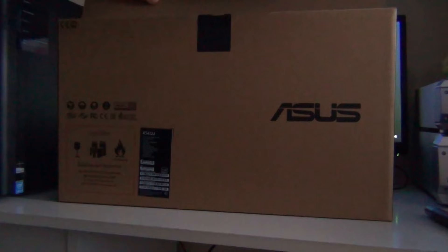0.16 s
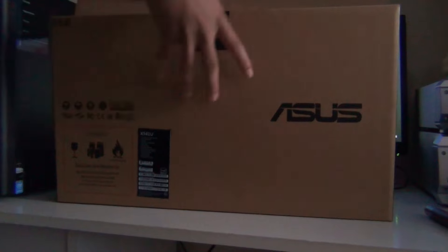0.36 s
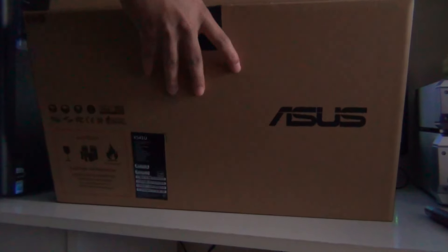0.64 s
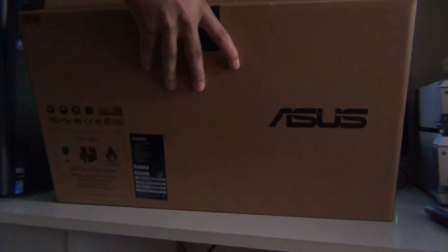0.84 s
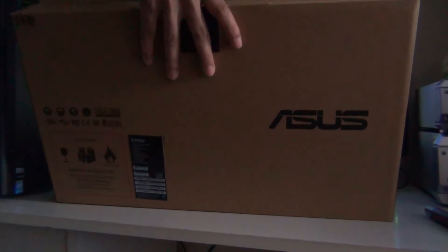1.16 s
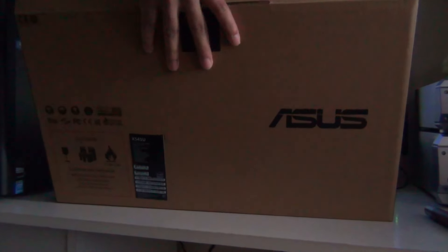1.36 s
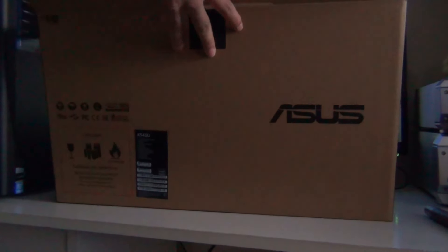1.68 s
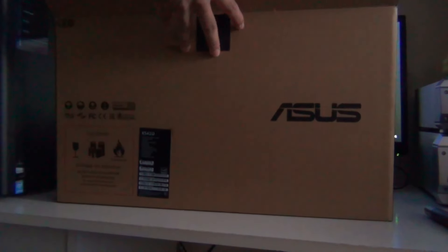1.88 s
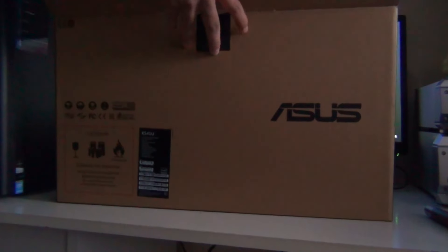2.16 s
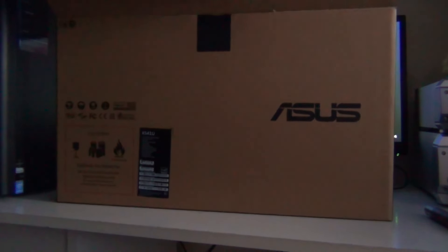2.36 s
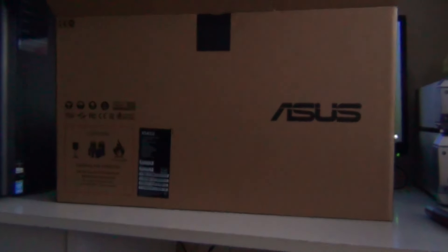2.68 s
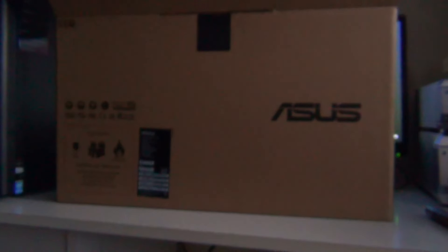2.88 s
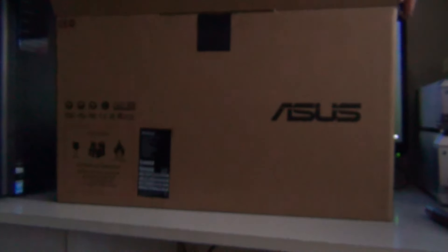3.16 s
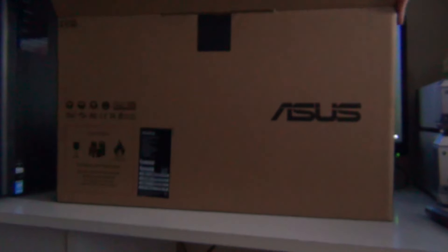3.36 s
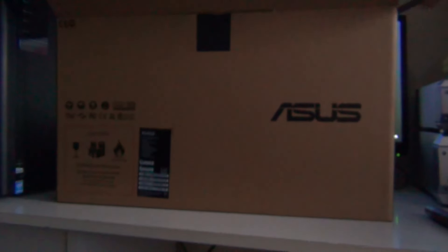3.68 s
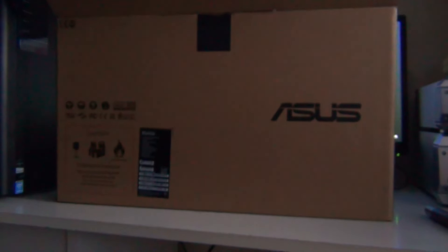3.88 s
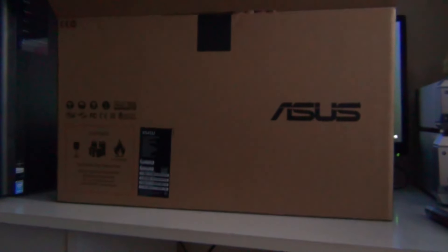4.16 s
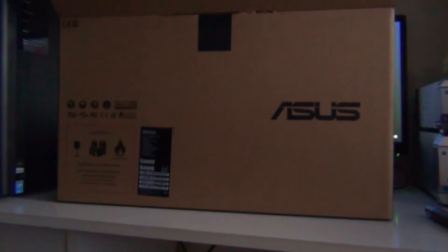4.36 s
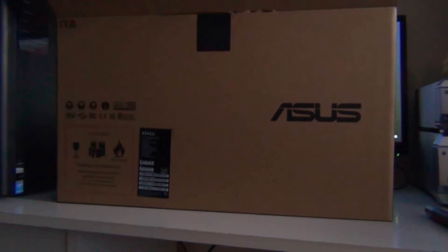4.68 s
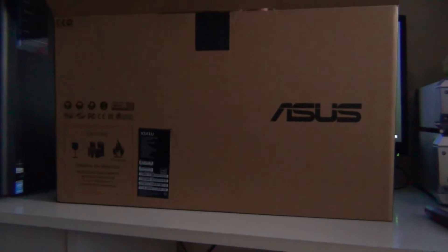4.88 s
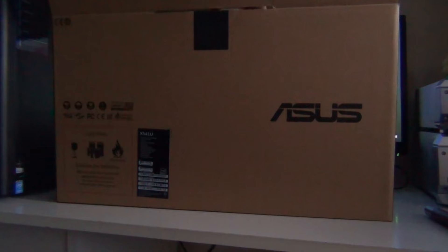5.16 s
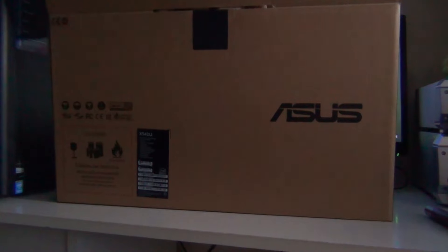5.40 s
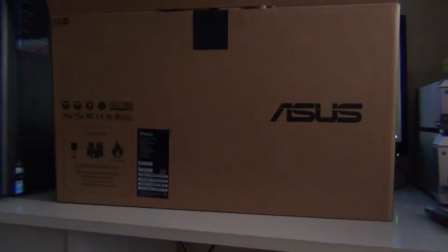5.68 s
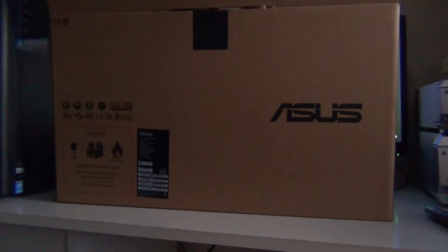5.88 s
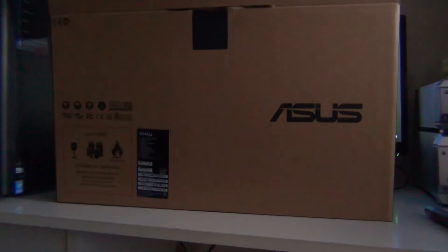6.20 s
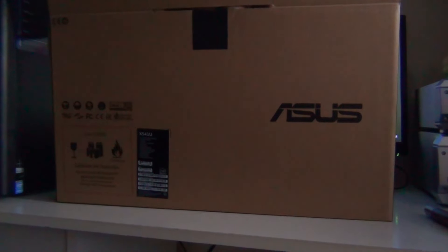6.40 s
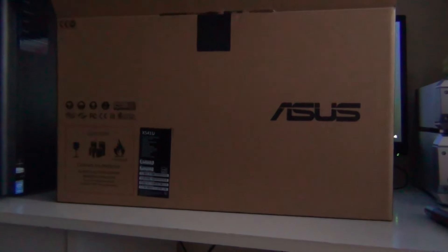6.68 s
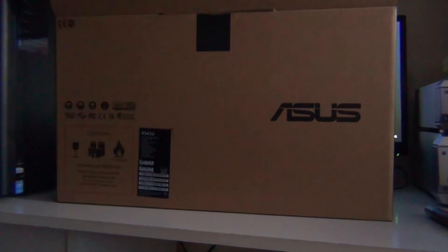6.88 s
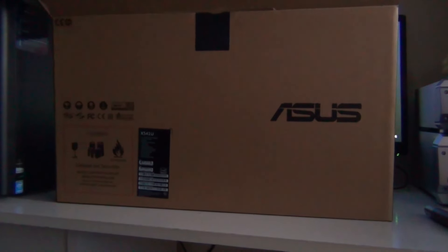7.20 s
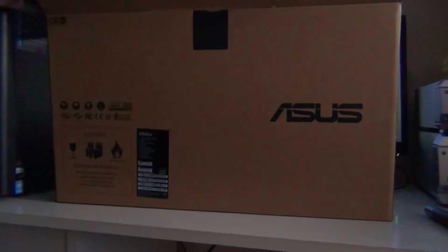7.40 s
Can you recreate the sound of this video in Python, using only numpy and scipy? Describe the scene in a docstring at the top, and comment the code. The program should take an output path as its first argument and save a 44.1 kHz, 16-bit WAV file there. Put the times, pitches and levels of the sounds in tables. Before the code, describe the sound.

Close stereo microphones in a small quiet room catch a large cardboard box being opened. Soft skin rubs and light taps come first, then a cluster of crackling pops as a stiff tab pulls free with a bright snap. Flaps scrape, creak and knock hollowly, with one strong thump past the middle, then more rubbing and a last flurry of dull knocks. Faint room noise stays beneath.

```python
"""Cardboard box opened by hand

A box stands on a shelf in a small quiet room; a pair of close microphone ports hears it over faint room noise.
Flaps knock, pop and snap: short contact bursts drive the ringing modes of the hollow box, walls and board.
Board and skin slide over board: random catches give a grainy hiss and creaking walls, and unsteady sine tones
give a few brief chirps of a ringing board patch and a few short squeaks. A very faint, high steady tone lies
behind it all."""
import sys
import numpy as np
from scipy import signal
from scipy.io import wavfile

SR = 44100
rng = np.random.default_rng(int(sys.argv[2]) if len(sys.argv) > 2 else 0)


def transcribe(u):
    """Save the signal u as a 16-bit wav file named by the first command-line argument.

    u: samples, shape (n,) or (channels, n), limited to [-1, 1]; the rate is SR.
    q: integer samples, one column per channel.
    """
    v = np.clip(np.atleast_2d(u).T, -1, 1)
    q = np.round(v * 32767).astype(np.int16)
    wavfile.write(sys.argv[1], SR, q)


N = 332514


def from_db(db):
    """Decibels to gain."""
    return 10 ** (np.asarray(db) / 20)


def rms_one(x):
    """Scaled to rms 1."""
    return x / np.sqrt(np.mean(x ** 2) + 1e-20)


def at_hz(points, hz):
    """A spectrum table read on a log-frequency axis."""
    table_hz, values = np.transpose(points)
    return np.interp(np.log(hz), np.log(table_hz), values)


def band(x, low_hz, high_hz):
    """Butterworth band-pass."""
    sos = signal.butter(2, [low_hz, min(high_hz, 0.45 * SR)], "band", fs=SR, output="sos")
    return signal.sosfilt(sos, x)


def drift(rate_hz):
    """Slow random wander of spread 1: noise smoothed by two equal poles, on a grid of 40 samples."""
    step = 40
    pole = np.exp(-2 * np.pi * rate_hz * step / SR)
    noise = rng.standard_normal(N // step + 2002)
    slow = signal.lfilter([1], [1, -2 * pole, pole ** 2], noise)[2000:]   # skip the filter's start
    return np.interp(np.arange(N) / step, np.arange(len(slow)), rms_one(slow))


def ring(force, hz, t60_s):
    """A damped resonance: a unit click sets a sine of height 1 ringing."""
    radius, angle = from_db(-60 / (t60_s * SR)), 2 * np.pi * hz / SR
    poles = [1, -2 * radius * np.cos(angle), radius ** 2]
    return signal.lfilter([0, np.sin(angle)], poles, force + 1e-18)


def grains(per_s, spread_db):
    """Fibres catch and let go at random: clicks of uneven size and either sign; rms 1."""
    sizes = from_db(spread_db * np.minimum(rng.exponential(1, N), 5))
    signs = rng.choice([-1, 1], N)
    return rms_one(sizes * signs * (rng.random(N) < per_s / SR))


def banded(source, spectrum, alike_table, patchy_db):
    """Half-octave bands, each with its own level, flicker and left-right likeness; rms 1."""
    out, edges = 0, 22 * 2 ** np.arange(0, 10, 0.5)
    for k, (low_hz, high_hz) in enumerate(zip(edges, edges[1:])):
        hz = np.sqrt(low_hz * high_hz)
        if hz < 0.7 * spectrum[0][0]:
            continue
        mid, side = band(source[k % 2], low_hz, high_hz)   # neighbouring bands use separate sources
        alike = np.clip(at_hz(alike_table, hz), -1, 1)
        gain = from_db(at_hz(spectrum, hz) + patchy_db * drift(9))
        pair = np.sqrt(1 + alike) * mid + np.sqrt(1 - alike) * side * [[1], [-1]]
        out = out + gain * pair
    return rms_one(out)


# Quiet room as the ports hear it. Each row: frequency in Hz, relative level in dB per Hz.
ROOM_NOISE = [(15, -41), (25, -2.5), (228, 3), (981, -2), (1470, -5.5), (6490, -18.5), (15800, -18)]
# Each row: frequency in Hz, left-right likeness of the room noise (1 is identical).
ROOM_NOISE_ALIKE = [(60, 1), (2000, 0.42), (15000, 0.78)]


def room_noise():
    """Faint noise of the room, nearly steady and almost identical at both ports in the bass."""
    noise = rng.standard_normal((2, 2, N))
    return from_db(-57.5) * banded(noise, ROOM_NOISE, ROOM_NOISE_ALIKE, patchy_db=0.5)


def whine():
    """A thin steady tone from a screen: one pure sine."""
    return from_db(-74) * np.sin(2 * np.pi * 15625 * np.arange(N) / SR)


# Strokes of board or skin over board, close to the ports. Each row: moment of full strength in seconds,
# rise in seconds, hold in seconds, fall in seconds, surface hiss in dB, drag on the box walls in dB.
STROKES = [(0.05, 0.16, 0, 0.12, -53, -57.5), (0.673, 0.084, 0.0031, 0.13, -54.5, -57),
           (0.797, 0.76, 0.074, 0.31, -68, -50.5), (0.968, 0.11, 0.0064, 0.19, -51, -55),
           (1.245, 0.064, 0.017, 0.06, -53.5, -62), (1.396, 0.063, 0.15, 0.12, -55, -53.5),
           (2.162, 0.27, 0.079, 0.4, -49, -56.5), (2.4, 0.096, 0.0051, 0.13, -42.5, -43.5),
           (2.619, 0.025, 0.0025, 0.14, -39, -47), (2.815, 0.12, 0.0012, 0.36, -38, -40),
           (3.055, 0.0094, 0.0034, 0.051, -37.5, -38.5), (3.178, 0.16, 0.034, 0.052, -43, -46.5),
           (3.456, 0.27, 0, 0.46, -46.5, -49.5), (4.092, 0.015, 0.094, .1, -48, -63),
           (4.196, 0.086, 0.022, 0.1, -40, -37), (4.463, 0.44, 0, 0.41, -51, -49.5),
           (4.754, 0.14, 0.19, 0.8, -44, -46.5), (5.3, 0.029, 0.12, 0.063, -41, -51.5),
           (5.93, 0.42, 0.04, 0.1, -41, -52.5), (6.166, 0.1, 0, 0.081, -46, -55),
           (6.269, 0.024, 0, 0.17, -53, -55.5), (6.501, 0.12, 0.31, 0.12, -38.5, -47),
           (6.979, 0.71, 0.0054, 0.094, -43, -45.5), (7.322, 0.2, .25, .2, -45.5, -53.5)]
HISS_COLUMN, DRAG_COLUMN = 4, 5
STROKE_SWING_DB = 20   # gained over the rise time, lost over the fall time


def strokes(column, resting_db, slower):
    """Level in dB: each stroke swells, holds and fades at a steady rate in dB; strokes add in power."""
    t = np.arange(0, N + 64, 64) / SR
    power = from_db(resting_db) ** 2   # hands never lie quite still on the board
    for row in STROKES:
        full_s, rise_s, hold_s, fall_s = row[:4]
        before = np.maximum((full_s - t) / rise_s, 0)
        after = np.maximum((t - full_s - hold_s) / fall_s, 0)
        level_db = row[column] - STROKE_SWING_DB * (before + after) / slower
        power = power + from_db(level_db) ** 2
    return np.interp(np.arange(N) / SR, t, 10 * np.log10(power))


# Sliding surface heard close. Each row: frequency in Hz, relative level in dB per Hz.
HISS = [(880, -18.5), (1500, -6.5), (2250, -7.5), (4430, -5.5), (10800, -9.5), (15800, -12)]
# Each row: frequency in Hz, left-right likeness of the hiss (1 is identical).
HISS_ALIKE = [(1500, 0.99), (9000, 0.77)]


def surface_hiss(hiss_db):
    """Fibres of the sliding surface catch as dense grains; plain noise sets the two ports apart."""
    fibres = np.array([[grains(9000, spread_db=0), rng.standard_normal(N)] for _ in range(2)])
    return from_db(hiss_db) * banded(fibres, HISS, HISS_ALIKE, patchy_db=2.2)


# Modes of the hollow box on its shelf. Each row: frequency in Hz, level in dB, decay by 60 dB in seconds.
BOX = [(106, -14.5, 0.083), (174.7, -7.5, 0.077), (237.3, 2.5, 0.086), (277, 0, 0.038), (397, -5, 0.061),
       (700, -5.5, 0.097)]


def drag(drag_db):
    """Sliding flaps catch densely; wall patches creak at their own pitches and the box hums along."""
    catches = grains(3000, spread_db=2.5) * from_db(2 * drift(20))
    pitches_hz = np.geomspace(330, 2300, 14)
    dealt = rng.integers(0, 14, N)   # each catch falls to one patch
    creak = np.zeros(N)
    for k, hz in enumerate(pitches_hz):
        patch = ring(catches * (dealt == k), hz, 14 / hz)
        creak += patch * from_db(4.5 * drift(5) + 3.36 * np.log2(hz / 330))
    hum = sum(from_db(level_db) * ring(catches, hz, t60_s) for hz, level_db, t60_s in BOX)
    hum = hum * from_db(5 * drift(8))
    mixed = rms_one(band(creak, 240, 7200)) + from_db(-5.5) * rms_one(band(hum, 173, 3900))
    return from_db(drag_db) * rms_one(mixed)


# Knocks and pops of the flaps, close to the ports. Each row: start in seconds, knock level in dB before
# each layer's own offset, thud in dB re the knock, crack in dB re the knock, struck patch's pitch in Hz.
KNOCKS = [(0.095, -38, -1, -13, 1190), (0.4876, -43, 9, -15, 970), (0.521, -53, 11.5, -25, 400),
          (1.0685, -32.5, -17, -34, 600), (1.338, -42.5, -25, -31, 1660), (1.3622, -36, -33, -14, 574),
          (1.3782, -43, -31, -2, 584), (1.7232, -33, -16, -28.5, 660), (1.9437, -31, -30, -33, 1205),
          (2.0163, -36, -2.5, -12, 400), (2.1771, -27.5, -0.5, -3, 2105), (2.363, -26, 1, -5.5, 1665),
          (2.3991, -24.5, 5.5, -7, 1960), (2.5925, -42, -4, 0, 1660), (2.6106, -22, 3, 2.5, 1560),
          (2.7961, -19.5, -7.5, -4.5, 1245), (2.824, -26, -40, -21, 1275), (2.956, -28, -14, -5.5, 1685),
          (2.997, -33.5, -20, -10, 1940), (3.047, -26.5, -9.5, -29, 550), (3.135, -30.5, -13, -26, 1960),
          (3.16, -32, -3.5, -11, 3570), (3.6448, -20.5, -28, -6.5, 578), (4.007, -38, -27, -9.5, 715),
          (4.0881, -29, 1.5, -1, 1346), (4.1425, -19.5, -12, -33, 400), (4.1655, -17.5, -15, -34, 936),
          (4.7713, -20.5, -32, -23, 1130), (4.785, -26.5, -13, -30, 1080), (4.806, -25.5, -10, -20, 870),
          (5.104, -26.5, -20, -31, 900), (5.2787, -32.5, 0.5, -21, 1390), (5.287, -13.5, -9, -14.5, 453),
          (5.3978, -30.5, -7, 6.5, 1560), (5.6976, -36.5, -24, -6, 1230), (5.8084, -25.5, -32, -32, 548),
          (6.118, -30, -18, -36, 574), (6.506, -28.5, -15, -29, 470), (6.5344, -19.5, -15, -23, 670),
          (6.603, -31.5, 3, -6, 460), (6.7177, -17.5, -4, -19.5, 490), (6.7265, -16, -7.5, -25.5, 607),
          (6.9366, -23, -8.5, -17, 500), (6.964, -23, -3, -20.5, 1136), (6.9918, -32, -10, -3, 1510)]
START_S, KNOCK_DB, THUD_DB, CRACK_DB, PITCH_HZ = np.transpose(KNOCKS)
TOP_FOLLOWS, DEEP_FOLLOWS = 0.42, 0.63   # weak cracks are duller, heavy thuds deeper (dB per dB)


def place(bursts, level_db):
    """Each knock's burst at its moment and level."""
    track = np.zeros(N + bursts.shape[1])
    for start_s, burst, gain in zip(START_S, bursts, from_db(level_db)):
        at = round(start_s * SR)
        track[at:at + len(burst)] += gain * burst
    return track[:N]


def contacts():
    """A sharp first touch, then a crunch that lasts longer the more the skin cracks; energy 1."""
    crunch_s, follows = 0.0039, 0.5   # crunch time at a 0 dB crack; share of the crack's dB that scales it
    t = np.arange(SR // 10) / SR
    length = np.clip(crunch_s * from_db(follows * CRACK_DB[:, None]), 0.0003, 0.03)
    envelope = np.exp(-t / length) * (1 - np.exp(-t / (0.2 * length)))
    bursts = rng.standard_normal((len(KNOCKS), len(t))) * envelope
    crunch_size = np.sqrt(np.sum(bursts ** 2, axis=1))
    # shorter crunches get a relatively stronger touch
    bursts[:, 0] = from_db(6) / 4 * crunch_size * np.sqrt(crunch_s / length[:, 0])
    return bursts / np.sqrt(np.sum(bursts ** 2, axis=1, keepdims=True))


def one_way_pushes(bursts):
    """The contact force as pushes in one direction only, summing to 1 for each knock."""
    return np.abs(bursts) / np.sum(np.abs(bursts), axis=1, keepdims=True)


def box(bursts):
    """The push of each contact drives the box modes; every knock finds each mode anew."""
    pushes, out = one_way_pushes(bursts), np.zeros(N)
    luck_db = rng.normal(0, 2, (len(KNOCKS), len(BOX)))
    for k, (hz, level_db, t60_s) in enumerate(BOX):
        octaves_deep = max(np.log2(220 / hz), 0)
        push_db = KNOCK_DB + THUD_DB + 5.5 + luck_db[:, k] + DEEP_FOLLOWS * THUD_DB * octaves_deep
        out += from_db(level_db) * ring(place(pushes, push_db), hz, t60_s) * (-1) ** k
    return band(out, 80, 2000)   # a small body radiates little deep bass


# Dense upper modes of the box walls, heard as dying noise.
# Each row: low edge in Hz, high edge in Hz, level in dB, decay by 60 dB in seconds.
WALLS = [(265, 532, 7, 0.062), (600, 1920, 3.5, 0.086), (1390, 9500, 7, 0.0083)]


def walls(bursts):
    """Each knock sets the dense upper modes off; they die band by band."""
    pushes, out = one_way_pushes(bursts), np.zeros(N)
    luck_db = rng.normal(0, 1.5, (len(KNOCKS), len(WALLS)))
    for k, (low_hz, high_hz, level_db, t60_s) in enumerate(WALLS):
        octaves_away = np.abs(np.log2(PITCH_HZ / np.sqrt(low_hz * high_hz)))
        # the sign as set: 1 dB more per octave between the band and the patch's pitch
        blow_db = KNOCK_DB + level_db + k * TOP_FOLLOWS / 2 * CRACK_DB + luck_db[:, k] + octaves_away
        blows = place(pushes, blow_db)
        dying = signal.lfilter([1], [1, -from_db(-60 / (t60_s * SR))], blows + 1e-18)
        out += band(dying * grains(4000, spread_db=0.5), low_hz, high_hz)
    return out


def patches():
    """The first touch sets the struck patch of board ringing briefly on a pair of modes at its own pitch."""
    level_db, t60_s, pair_ratio = -5.5, 0.028, 1.257   # level of each mode re the knock
    touch = np.arange(SR // 10) == 0
    rings = np.array([ring(touch, hz, t60_s) + ring(touch, pair_ratio * hz, t60_s) for hz in PITCH_HZ])
    return band(place(rings, KNOCK_DB + level_db), 250, 8000)   # a small patch radiates no bass


# Stiff tab of the lid, ringing brightly while it is pulled free.
# Each row: frequency in Hz, level in dB, decay by 60 dB in seconds.
TAB = [(3810, -32, 0.021), (5700, -23.5, 0.014), (11700, -32, 0.0067)]
TAB_FROM_S, TAB_TO_S, TAB_RUB_DB = 2.04, 2.9, -7   # rubbing in dB re the surface hiss


def cracks(bursts, hiss_db):
    """The board's skin cracks at each knock; cracks and rubbing ring the lid's tab while it is pulled."""
    broad = band(band(place(bursts, KNOCK_DB + 9), 500, 3500), 500, 3500)
    bright = place(bursts, KNOCK_DB + CRACK_DB + 24)
    top = place(bursts, KNOCK_DB + (1 + TOP_FOLLOWS) * CRACK_DB + 23)
    t = np.arange(N) / SR
    rubbing = from_db(hiss_db + TAB_RUB_DB) * rng.standard_normal(N)
    tab_force = (bright + rubbing) * (t > TAB_FROM_S) * (t < TAB_TO_S)
    tab = sum(from_db(level_db) * ring(tab_force, hz, t60_s) for hz, level_db, t60_s in TAB)
    return broad + band(bright, 3200, 5450) + band(top, 10000, 11500) + tab


# Short tones close to the ports: the first three rows are brief chirps of a patch of board ringing near its own
# pitch, # the rest squeaks of board on board. Each row: start in seconds, length in seconds before the final
# fade, # pitch in Hz, spread of the pitch in Hz, level in dB.
SQUEAKS = [(0.68, 0.0082, 1210, 40, -42), (0.972, 0.0074, 1400, 48, -43), (1.024, 0.0068, 1106, 60, -43),
           (1.208, 0.067, 4320, 120, -57), (3.152, 0.041, 3970, 330, -41), (5.402, 0.035, 1620, 40, -47),
           (7.211, 0.057, 1256, 5, -44)]


def squeaks():
    """Short tones that settle near one pitch for a moment: brief chirps of a ringing board patch and stick-slip
    squeaks; pitch and strength tremble."""
    out, t = np.zeros(N), np.arange(N) / SR
    waver, tremble = drift(150), from_db(3 * drift(60))
    for start_s, length_s, hz, width_hz, level_db in SQUEAKS:
        tone = np.sin(2 * np.pi * np.cumsum(hz + width_hz * waver) / SR) * tremble
        corners_s = [start_s, start_s + 0.003, start_s + length_s, start_s + 1.4 * length_s]
        out += from_db(level_db) * tone * np.interp(t, corners_s, [0, 1, 0.7, 0])
    return out


def room(x):
    """Small-room echo: eight feedback delays a side, duller on every round."""
    t60_s, wall_cut_hz = 0.23, 8300
    out, dull = np.zeros((2, N)), np.exp(-2 * np.pi * wall_cut_hz / SR)
    lags = (rng.uniform(0.009, 0.03, 16) * SR).astype(int)
    for k, lag in enumerate(lags):
        loop, gain, state = x.copy(), from_db(-60 * lag / SR / t60_s), [0.0]
        for i in range(lag, N, lag):
            back, state = signal.lfilter([gain * (1 - dull)], [1, -dull], loop[i - lag:i], zi=state)
            loop[i:i + lag] += back[:N - i]
        out[k % 2] += (loop - x) * (-1) ** (k // 2)
    middle = out.mean(axis=0)
    return middle + 0.5 * band(out - middle, 740, 17000)   # close ports hear the same bass


def scene():
    """Box, flaps and hands in the room."""
    hiss_db = strokes(HISS_COLUMN, resting_db=-66, slower=1)
    drag_db = strokes(DRAG_COLUMN, resting_db=-75, slower=1.064)   # the walls' drag lingers a little
    bursts = contacts()
    knocking = box(bursts) + walls(bursts) + patches() + cracks(bursts, hiss_db)
    near = knocking + drag(drag_db) + squeaks()
    echo = from_db(-11) * room(near)
    return near + echo + surface_hiss(hiss_db) + room_noise() + whine()


def record(dry):
    """The microphone pair's top is cut steeply by an elliptic low-pass at 15.9 kHz."""
    return signal.sosfilt(signal.ellip(10, 0.3, 75, 15900, fs=SR, output="sos"), dry)


dry = scene()
out = record(dry)
transcribe(out)
```